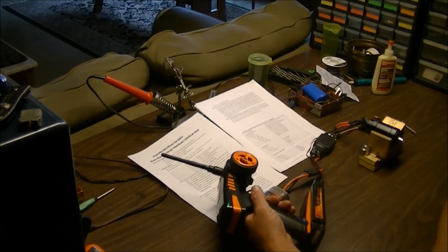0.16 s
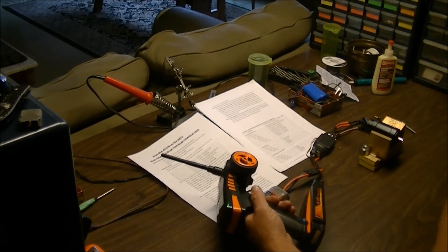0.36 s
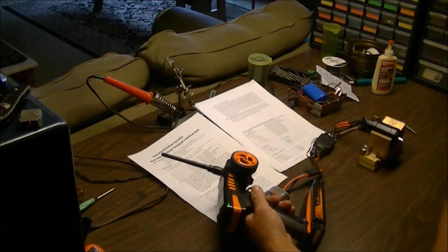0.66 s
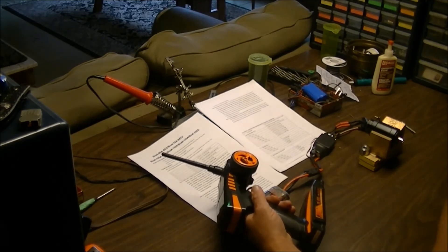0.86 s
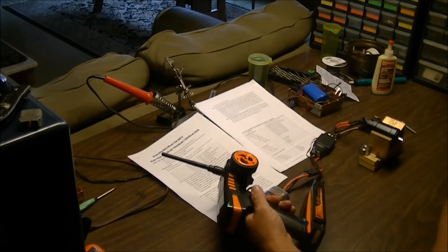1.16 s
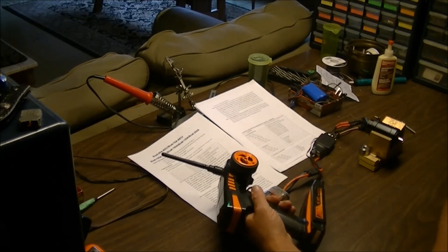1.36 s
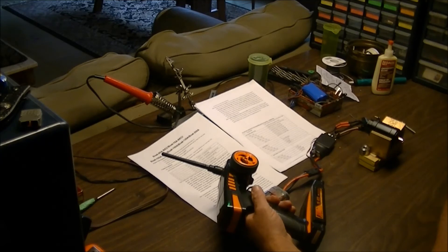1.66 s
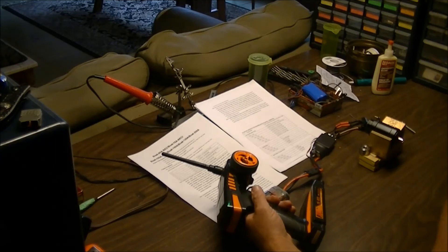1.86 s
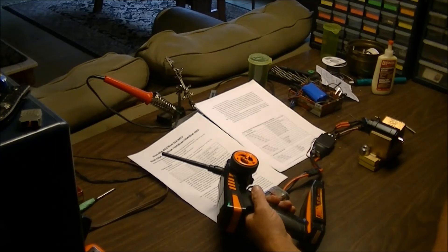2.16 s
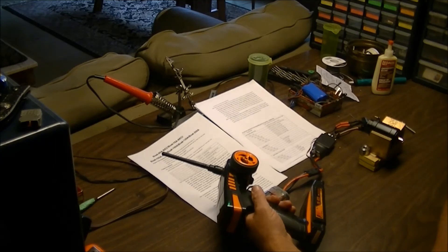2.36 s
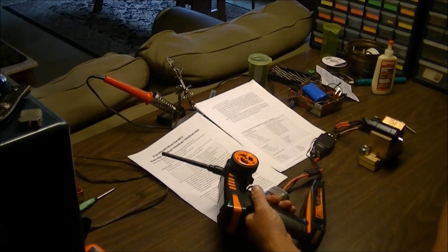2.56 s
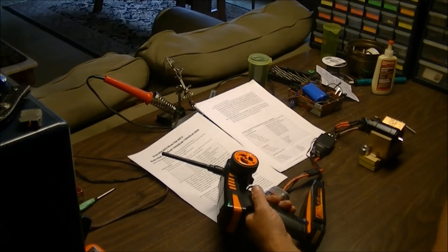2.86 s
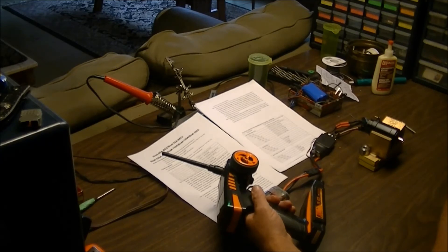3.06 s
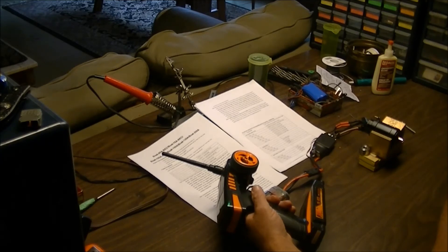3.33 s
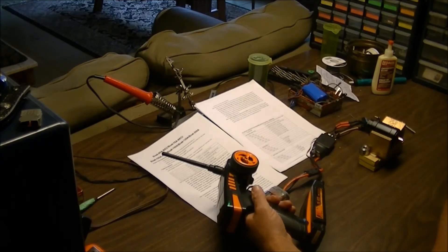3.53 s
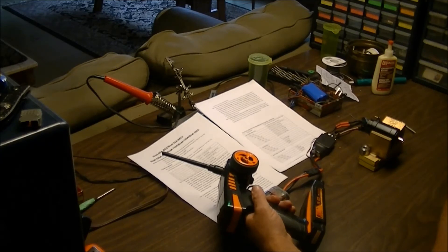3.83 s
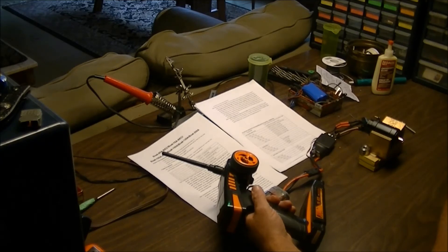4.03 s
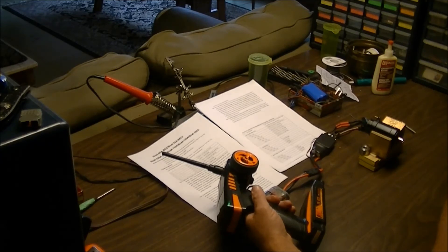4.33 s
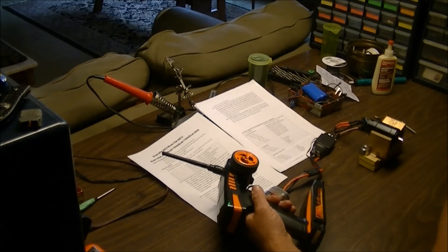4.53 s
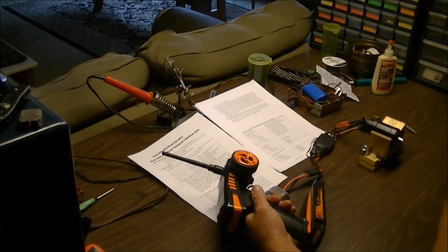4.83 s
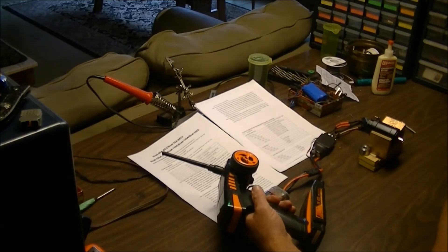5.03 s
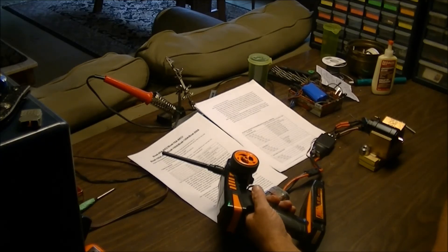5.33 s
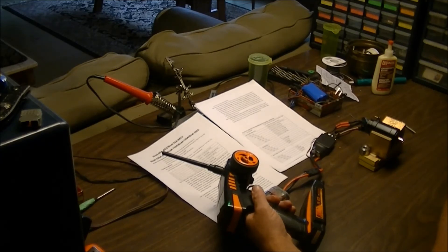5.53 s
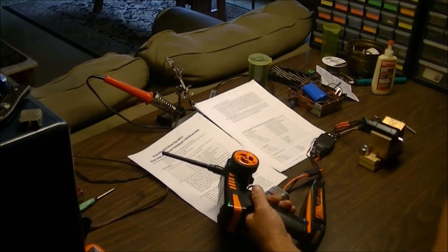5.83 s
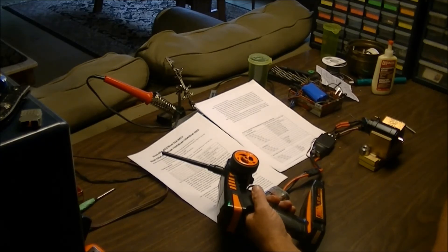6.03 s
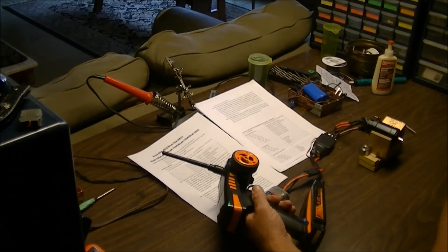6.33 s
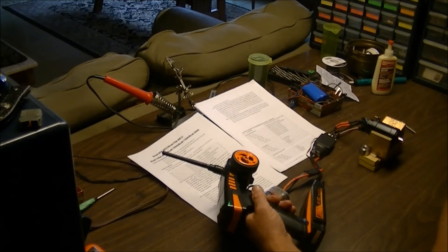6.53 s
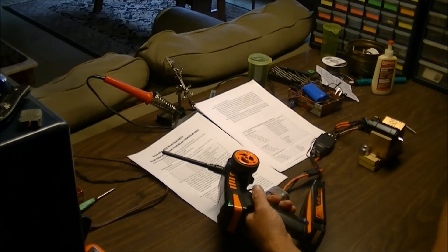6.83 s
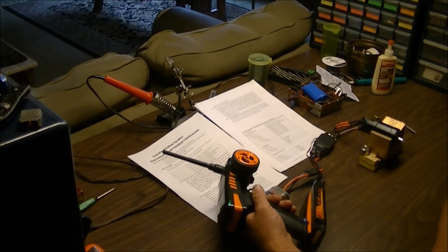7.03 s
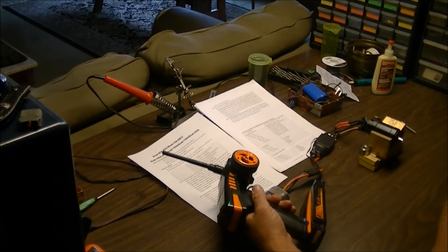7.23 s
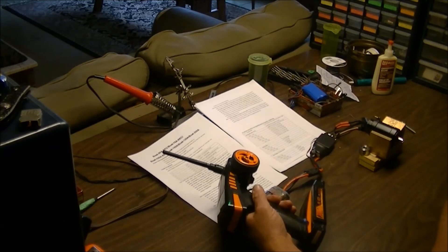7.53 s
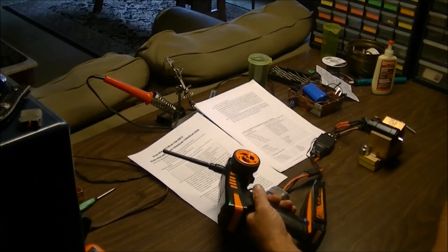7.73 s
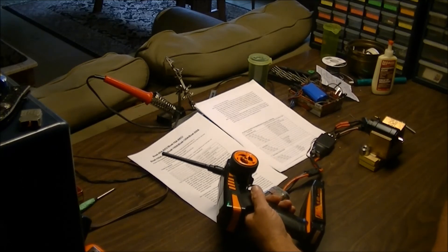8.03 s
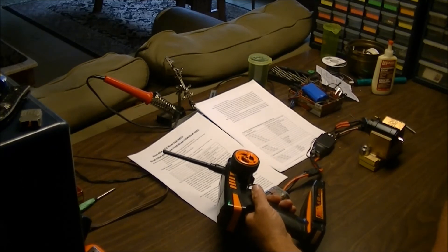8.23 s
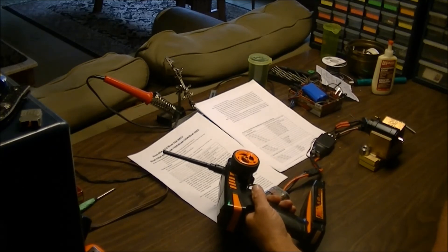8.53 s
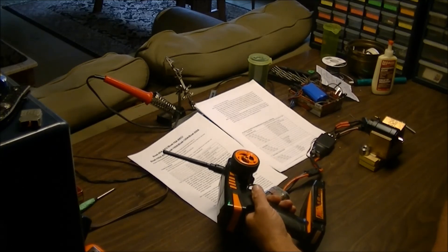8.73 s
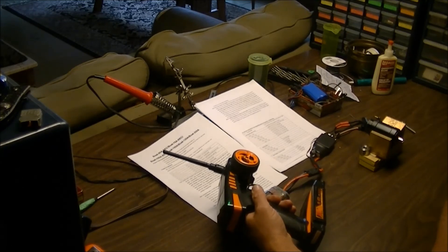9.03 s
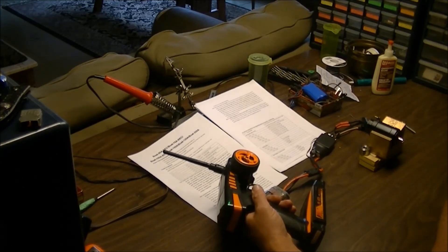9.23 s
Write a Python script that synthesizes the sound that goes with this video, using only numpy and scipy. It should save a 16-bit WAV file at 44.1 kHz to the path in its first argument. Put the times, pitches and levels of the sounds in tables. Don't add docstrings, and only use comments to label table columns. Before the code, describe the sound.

A small brushless motor on a wooden bench whines steadily high with a gritty bearing rattle, then drops in uneven steps to a low, clattering idle. A trigger clicks and it surges almost instantly to a wavering scream. A loud plastic snap releases it, and the whine slides smoothly down to rest, with a tiny spring creak. Close stereo microphones, quiet room.

```python
import sys
import numpy as np
from scipy import signal
from scipy.fft import rfft, irfft, next_fast_len
from scipy.io import wavfile
from scipy.ndimage import uniform_filter1d

SR = 44100
rng = np.random.default_rng(int(sys.argv[2]) if len(sys.argv) > 2 else 0)


def attenuation_scalar(level_db):
    decades = np.asarray(level_db, float) / 20
    return 10 ** decades


def wrap_up_sound(samples):
    columns = np.atleast_2d(samples).T
    tamed = np.clip(columns, -1, 1)
    steps = np.round(tamed * 32767).astype(np.int16)
    wavfile.write(sys.argv[1], SR, steps)


N = 413767

# start_s, speed_change_hz_per_s, settling_s
PUSHES = [(0.0, 0.0, 1.0), (0.499, -81.6, 2.999), (0.811, -38.6, 0.079), (1.398, -103.9, 0.93),
          (1.607, -69.8, 0.112), (2.189, -305.4, 0.316), (2.471, -185.8, 0.18), (2.901, -14.8, 2.129),
          (3.18, 7.9, 1.348), (3.502, -79.3, 2.997), (3.69, -278.4, 0.467), (4.2, -87.4, 0.301),
          (4.686, 20.8, 0.223), (5.829, -52.1, 3.0), (6.175, 37.9, 0.32), (6.38, 7.8, 2.99),
          (6.819, 1673.2, 1.125), (6.93, 1470, 0.061), (7.144, -80.9, 0.693), (7.238, -328.1, 0.131),
          (7.354, 172.3, 0.944), (7.499, -347.0, 0.063), (7.623, 271.3, 0.13), (7.858, -125.5, 2.003),
          (7.971, -394.2, 1.536), (8.517, -253, 1.546), (8.845, -205, 1.5)]
START_HZ = 320.2
# mode_hz, width_hz, order_12_24_level_db, order_11_22_level_db
MAGNET_MODES = [(587, 15, -60.5, -82), (689, 54, -56, -94), (815, 20, -44.5, -70), (890, 33.6, -41, -61),
                (1027, 71, -40, -74), (1223.0, 23.0, -43, -65), (1323, 24.5, -37.5, -58),
                (1700, 135, -48, -48.5), (2010, 430, -60, -52.5), (2720, 220, -52.5, -48.5),
                (3255, 68, -40.5, -46), (3530, 274, -44.5, -86), (4810, 430, -55, -44.5),
                (7020, 1046.0, -75, -44.5)]
# mode_hz, width_hz, order_12_24_level_db, order_11_22_level_db
END_BELL = [(215, 50, -66, -86), (414, 50, -65, -83), (4210, 240, -44, -76), (5860, 85, -73, -44)]
# shaft_multiple, mode_column, level_db, slope_db_per_octave of speed
MAGNET_ORDERS = [(12, 2, 0, 0), (11, 3, 0, 0), (24, 2, -13, -1), (22, 3, -26, 15)]
ORDER_TRIM_DB = 2.5, 0.97, 1.9, 2.7
# pitch_hz, width_hz, depth_db
NULLS = [(515, 30, -12), (685, 5, -12), (746, 14, -16), (3870, 90, -6)]
# shaft_hz, level_db
UNBALANCE = [(100, -125), (150, -99), (176, -83.5), (192, -77), (223, -80), (238, -70), (254, -79),
             (266, -94.5), (278, -75), (290, -72.5), (298, -64.5), (308, -69.5), (320, -59.5)]
KNOCK_ORDERS = (2 / 3, 4 / 3, 2, 8 / 3, 3, 4, 5, 6, 7, 8, 9, 10, 12.63, 13, 14.6, 15.2, 15.76, 16.7, 17.7,
                 20)
KNOCK_DB = (-82.5, -67.5, -63.5, -76, -58.5, -63.5, -65, -73.5, -74, -68, -54, -65, -59, -56.5, -63, -59.5,
             -58.5, -67.5, -59.5, -67)
# pitch_hz, level_db
KNOCK_PATH = [(150, -9.5), (200, -15), (400, -16), (590, -5.5), (640, -17), (740, -1), (790, 0), (1000, -3),
              (4200, -8), (4900, 9.5), (5300, -2), (5800, -4)]
# pitch_hz, width_hz, level_db
BENCH = [(906, 165, -1), (1346, 240, 3), (1788, 245, 7.5), (2067, 212, 8), (2356, 366, -1)]
# pitch_hz, width_hz, level_db
CAN = [(2733, 114, 2.5), (2870, 65, -2.5), (3280, 980, -8.5), (4126, 155, 0.5), (4390, 680, -3),
       (4785, 182, 6), (4958, 229, 3), (5458, 214, -6.5), (5310, 244, -8)]
# pitch_hz, width_hz, level_db
AIR = [(6600, 420, -5.5), (7710, 280, -4), (8290, 700, -4.5), (9100, 490, 2.5), (9670, 630, -2.5),
       (11020, 910, -13), (11830, 590, -16.5), (15000, 690, -18.5)]
# shaft_hz, bench_db, can_db, air_db
RATTLE_LAW = [(10, -90, -92, -87), (30, -59, -75, -88), (56.8, -54, -65.5, -84.5), (76.7, -52, -59, -77.5),
              (118, -49, -52, -71.5), (163, -51.5, -47.5, -64.5), (259, -54.5, -48.5, -53.5),
              (274, -56, -47.5, -54.5), (315.4, -55, -45, -50)]
FLAW_SHARE = 1.3, 1.5, .3
STRAIN_DB = 1, 1.5, 0
# bench_db, can_db, air_db
COAST_DB = (-1.5, -1, -3.5)
COAST_S = 8.1
# start_s, peak_db
SLAPS = [(3.9438, -25), (4.0022, -29.5), (4.1358, -31), (4.304, -28), (4.4958, -25.5), (4.5604, -25),
         (4.6741, -52), (4.7463, -51), (4.8257, -30.5), (4.942, -40), (5.078, -31), (5.2806, -33),
         (5.3475, -47), (5.3814, -44), (5.5728, -59), (5.6448, -37), (5.837, -53), (5.936, -40),
         (6.129, -40), (6.2545, -44), (6.2914, -48), (6.3147, -53), (6.5023, -35.5), (6.5377, -32.5),
         (6.6123, -30), (6.712, -32)]
# start_s, peak_db, colour_hz, tail_t60_s
CLICKS = [
    (6.8168, -28, 3550, 0.026),
    (7.553, -31, 3000, 0.16),
    (7.805, -11, 2770, 0.14),
    (7.8102, -23, 3500, 0.063),
    (7.819, -30, 2500, 0.11),
    (7.825, -23, 2430, 0.35),
]
# pitch_hz, level_db, t60_s
TRIGGER = [(935, -3, 0.048), (1310, -7, 0.015), (1690, 3, 0.015), (2350, 9.5, 0.018), (2870, -7, .05),
           (3500, 11.5, 0.0047), (4000, 0, 0.01), (4800, 4, 0.0085), (5560, -0.5, 0.047), (7200, -24, .015)]
# time_s, level_db
CREAK = [
    (8.9, -77),
    (8.94, -63),
    (8.98, -59),
    (9.005, -54.5),
    (9.03, -60.5),
    (9.05, -105),
]
# pitch_hz, width_hz, level_db
SPRING = [(490, 580, 6), (4100, 660, -1.5), (4940, 330, -1.5), (6900, 970, -8), (8100, 400, -3),
          (8400, 230, -7)]
# pitch_hz, level_db per Hz
ROOM = [(15, -70), (25, -41), (183, -17), (233, -16), (349, -6.5), (389, -2.5), (445, -2.5), (537, -3),
        (722, 2.5), (1240, 2.5), (5580, -9), (6050, -14), (15500, -30.5)]
# pitch_hz, side_over_mid_db
WIDTH = [(60, -4), (95, -5), (150, -3), (240, -49), (380, -1.5), (600, -16.5), (950, -19.5), (1500, -26.5),
         (2380, -16), (3770, -25.5), (5980, -27.5), (9470, -17.5), (15000, -12)]


def rms_one(x):
    return x / np.sqrt(np.mean(x ** 2) + 1e-20)


def at_hz(points, hz):
    point_hz, point_db = np.array(points)[:, 0], np.array(points)[:, 1]
    return np.interp(np.log(np.maximum(hz, 1)), np.log(point_hz), point_db)


def drift(rate_hz):
    slow = rng.standard_normal(N // 40 + 2002)
    r = np.exp(-80 * np.pi * rate_hz / SR)
    slow = signal.lfilter([1], [1, -2 * r, r * r], slow)[2000:]
    return np.interp(np.arange(N) / 40, np.arange(len(slow)), rms_one(slow))


def filtered(x, order, hz, kind="low"):
    return signal.sosfilt(signal.butter(order, hz, kind, fs=SR, output="sos"), x)


def body(force, peaks):
    out = 0
    for k, (hz, width_hz, db) in enumerate(peaks):
        r = np.exp(-np.pi * width_hz / SR)
        numerator = (1 - r * r) / 2 * np.array([1, 0, -1])
        denominator = [1, -2 * r * np.cos(2 * np.pi * hz / SR), r * r]
        out = out + (-1) ** k * attenuation_scalar(db) * signal.lfilter(numerator, denominator, force + 1e-18)
    return out


def echoes(t60_s):
    t = np.arange(SR // 4) / SR
    tail = rng.standard_normal(len(t)) * attenuation_scalar(-60 * t / t60_s)
    return tail / np.sqrt(np.sum(tail ** 2))


def reflected(x, t60_s):
    return signal.oaconvolve(x, echoes(t60_s))[:N]


def rotor():
    t, hz, start_hz = np.arange(N) / SR, np.zeros(N), START_HZ
    ends = [row[0] for row in PUSHES[1:]] + [N / SR]
    for (s, push, settle_s), end in zip(PUSHES, ends):
        now = (t >= s) & (t < end)
        hz[now] = start_hz + push * settle_s * (1 - np.exp((s - t[now]) / settle_s))
        start_hz += push * settle_s * (1 - np.exp((s - end) / settle_s))
    hz = np.maximum(hz + START_HZ * (hz == 0), 5)
    return uniform_filter1d(hz, size=SR // 50)


def mode_sum(modes, column, pitch_hz):
    return sum((-1) ** k * attenuation_scalar(row[column]) / (1 + 2j * (pitch_hz - row[0]) / row[1])
               for k, row in enumerate(modes))


def pull_db(shaft_hz):
    grid_hz, out = np.geomspace(5, 400, 3000), []
    for (order, column, db, slope), trim_db in zip(MAGNET_ORDERS, ORDER_TRIM_DB):
        pitch_hz = order * grid_hz
        can, bell = [mode_sum(modes, column, pitch_hz) for modes in (MAGNET_MODES, END_BELL)]
        level = 10 * np.log10(abs(can) ** 2 + abs(bell) ** 2)
        level += db + trim_db + slope * np.log2(grid_hz / 150)
        level += 9 * np.minimum(np.log2(pitch_hz / 560), 0)
        if column == 2:
            for hz, width_hz, depth_db in NULLS:
                level += depth_db * np.exp(-((pitch_hz - hz) / width_hz) ** 2)
        out.append(np.interp(shaft_hz, grid_hz, level))
    out[1] += 10 * np.minimum(np.log2(shaft_hz / 100), 0)
    coasting = np.arange(N) / SR > COAST_S
    out[2] += coasting * 4.5 * np.log2(shaft_hz / 110)
    return out


def whine(shaft_hz, angle):
    magnets, levels = 0, pull_db(shaft_hz)
    for order, db in zip((12, 11, 24, 22), levels):
        waver_db = 1.5 + 1.74 * (order == 24)
        level = attenuation_scalar(db + 0.96 * drift(24) + waver_db * drift(2.86))
        magnets = magnets + level * np.sin(order * angle + 0.035 * drift(30))
    slow = np.clip((230 - shaft_hz) / 20, 0, 1) * np.clip(shaft_hz / 30 - 2.3, 0, 1)
    magnets += slow * attenuation_scalar(levels[1] - 3 + 2.5 * drift(5)) * np.sin(10.07 * angle + 0.6 * drift(8))
    magnets += (abs(shaft_hz - 55) < 12) * attenuation_scalar(-76 + 3 * drift(4)) * np.sin(60 * angle)
    magnets *= np.clip(shaft_hz / 6 - 1.5, 0, 1)
    glide = np.clip(abs(np.gradient(np.log(shaft_hz))) * SR * 2, 0, 1)
    late = reflected(0.4 * glide * magnets, 0.35)
    return np.sqrt(2) * ((1 - 0.2 * glide) * magnets + late)


def unbalance(shaft_hz, angle):
    return np.sqrt(2) * attenuation_scalar(at_hz(UNBALANCE, shaft_hz)) * np.sin(angle)


def knock(shaft_hz, angle):
    out = 0
    slip = 0.25 * drift(3)
    fade = (shaft_hz / 300) ** 3.45
    change = np.minimum(abs(np.gradient(shaft_hz)) * SR / 150, 1)
    for order, db in zip(KNOCK_ORDERS, KNOCK_DB):
        level = attenuation_scalar(db + at_hz(KNOCK_PATH, order * shaft_hz) + 1.7 * drift(1.77) - 1.5 * change)
        turned = angle + (order % 1 > 0) * slip
        out += fade * level * np.sin(order * turned + rng.uniform(0, 5.4))
    return np.sqrt(2) * out


def shaking_db(shaft_hz):
    hz, *laws = np.transpose(RATTLE_LAW)
    change = np.minimum(abs(np.gradient(shaft_hz)) * SR / 300, 1)
    change = uniform_filter1d(change, size=SR // 10)
    off = np.clip((np.arange(N) / SR - COAST_S) / 0.21, 0, 1)
    return [np.interp(np.log(shaft_hz), np.log(hz), law) + strain * change + coast * off
            for law, strain, coast in zip(laws, STRAIN_DB, COAST_DB)]


def rattle(shaft_hz, angle):
    out, clumps = 0, drift(8.2)
    passes = np.floor(0.526 * angle / (2 * np.pi) + 0.035 * drift(3) + 0.004 * drift(40))
    flaw = np.diff(passes, prepend=0) / np.sqrt(shaft_hz) * attenuation_scalar(0.6 * drift(32))
    flaw = rms_one(flaw) * np.minimum(shaft_hz / 300, 1.1)
    density = np.clip((500 + 22 * shaft_hz) / SR, 1e-4, 1)
    parts = zip((BENCH, CAN, AIR), shaking_db(shaft_hz), (3.2, 3.0, 2.2), FLAW_SHARE, (3000, 7000, 16000))
    for peaks, db, grit_db, share, top_hz in parts:
        sizes = attenuation_scalar(grit_db * np.minimum(rng.exponential(1, N), 5)) * rng.choice([-1, 1], N)
        hits = sizes * (rng.random(N) < density) / np.sqrt(density)
        rub = 1.18 * rng.standard_normal(N)
        force = (rms_one(hits) + rub) * (1 + 0.17 * np.cos(angle)) + share * flaw
        ring = filtered(body(force, peaks), 2, top_hz)
        patchy_db = 1.1 * clumps + 0.7 * drift(9)
        out = out + attenuation_scalar(db + 1.5 + patchy_db) * rms_one(ring)
    return out


def ball_slaps():
    slaps = np.zeros(N)
    for s, db in SLAPS:
        slaps[round(s * SR)] = attenuation_scalar(db)
    slaps = filtered(reflected(slaps, 0.03), 2, 3500)
    return attenuation_scalar(17) * body(slaps, BENCH) + attenuation_scalar(14.5) * body(slaps, CAN)


def controller(shaft_hz, angle):
    t = np.arange(N) / SR
    carrier = 2 * np.pi * 7988 * t
    sides = attenuation_scalar(-10) * np.sin(carrier - 4 * angle) + attenuation_scalar(-20) * np.sin(carrier - 12 * angle)
    push = np.clip(np.gradient(shaft_hz) * SR / 1400, -0.1, 1)
    loaded = np.exp(-(np.log(shaft_hz / 170) / 0.29) ** 2)
    idle_db, load_db, surge_db, off_db_per_s = -75.5, 4.5, 14, 150
    db = idle_db + load_db * loaded + surge_db * push + drift(3.2)
    db -= off_db_per_s * np.maximum(t - COAST_S + 0.12, 0)
    return np.sqrt(2) * attenuation_scalar(db) * (np.sin(carrier) + sides)


def trigger_clicks():
    out, t = np.zeros(N), np.arange(SR // 4) / SR
    for s, db, colour_hz, t60_s in CLICKS:
        ring = 0
        for hz, mode_db, decay_s in TRIGGER:
            tilt_db = -7 * abs(np.log(hz / colour_hz))
            envelope = attenuation_scalar(mode_db + tilt_db + rng.normal(0, 1.9) - 60 * t / min(decay_s, t60_s))
            ring = ring + envelope * np.sin(2 * np.pi * hz * t) * rng.choice([-1, 1])
        crackle = rng.standard_normal(len(t)) * attenuation_scalar(-60 * t / t60_s)
        crackle = filtered(crackle, 2, [0.16 * colour_hz, 1.77 * colour_hz], "band")
        start = round(s * SR)
        out[start:start + len(t)] += attenuation_scalar(db) * (0.27 * ring + 0.41 * crackle)
    return filtered(out, 6, 8200)


def spring_creak():
    slips = rng.standard_normal(N) * (rng.random(N) < 0.05)
    s, db = np.transpose(CREAK)
    return attenuation_scalar(np.interp(np.arange(N) / SR, s, db)) * rms_one(body(slips, SPRING))


def coloured(x, points):
    size = next_fast_len(N)
    hz = np.arange(size // 2 + 1) * SR / size
    return irfft(rfft(x, size) * attenuation_scalar(at_hz(points, hz)), size)[:N]


def room_tone():
    return attenuation_scalar(-67.5) * rms_one(coloured(rng.standard_normal(N), ROOM))


def scattered(x):
    size = next_fast_len(N + SR)
    phases = rfft(echoes(0.017), size)
    return irfft(rfft(x, size) * phases / abs(phases), size)[:N]


def scene():
    shaft_hz = rotor()
    angle = 2 * np.pi * np.cumsum(shaft_hz) / SR
    struck = rattle(shaft_hz, angle) + ball_slaps() + trigger_clicks() + spring_creak()
    struck = 0.77 * struck + 0.47 * reflected(struck, 0.27)
    struck = filtered(struck, 3, 620, "high")
    tones = whine(shaft_hz, angle) + unbalance(shaft_hz, angle) + knock(shaft_hz, angle)
    mid = struck + tones + controller(shaft_hz, angle) + room_tone()
    side = coloured(scattered(mid), WIDTH)
    return np.array([mid + side, mid - side])


def low_pass(x):
    return signal.sosfilt(signal.butter(12, 16130, fs=SR, output="sos"), x)


def record(dry):
    mix = signal.sosfilt(signal.cheby2(10, 60, 16450, fs=SR, output="sos"), dry)
    return low_pass(mix)


dry = scene()
out = record(dry)
wrap_up_sound(out)
```